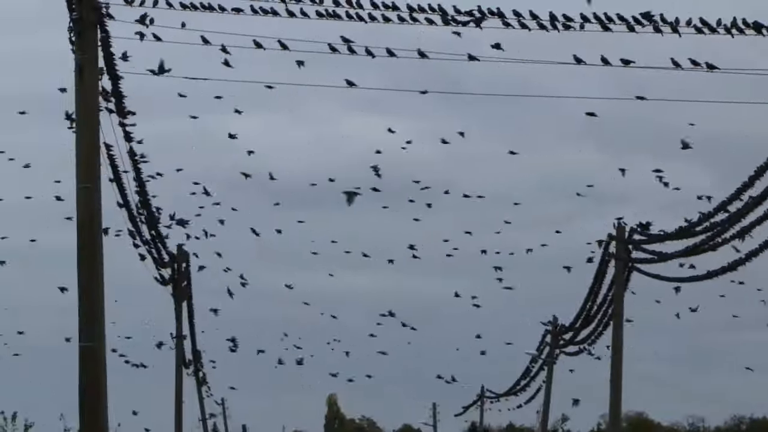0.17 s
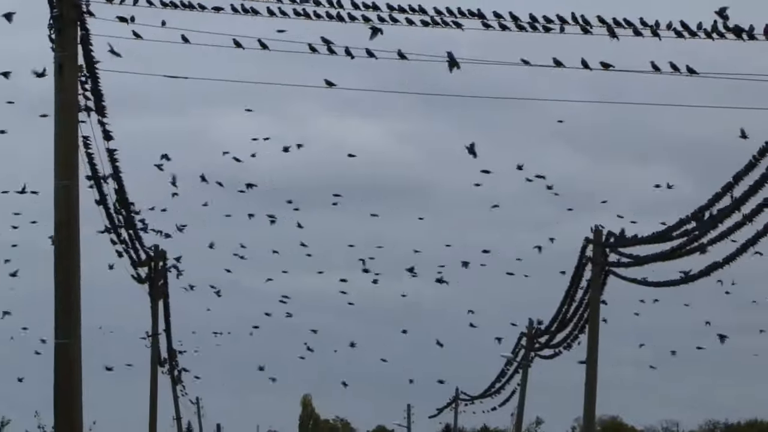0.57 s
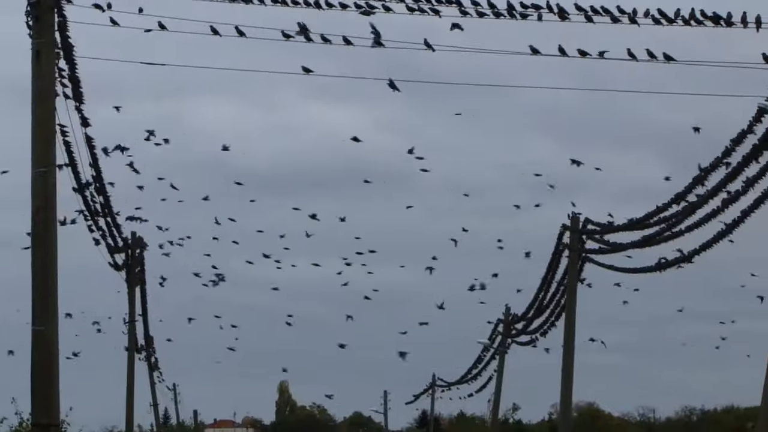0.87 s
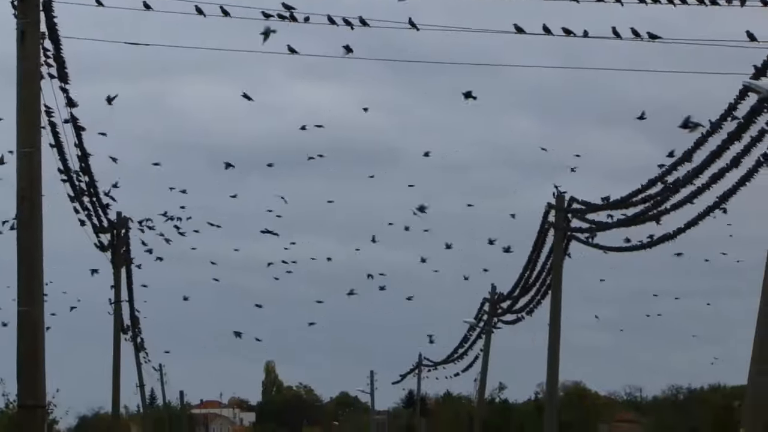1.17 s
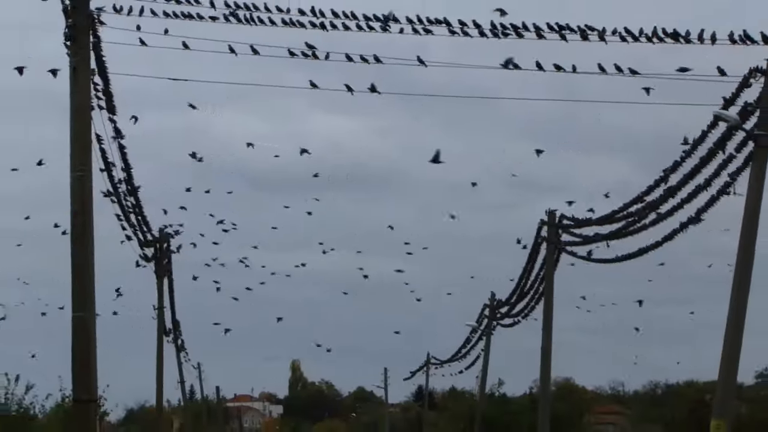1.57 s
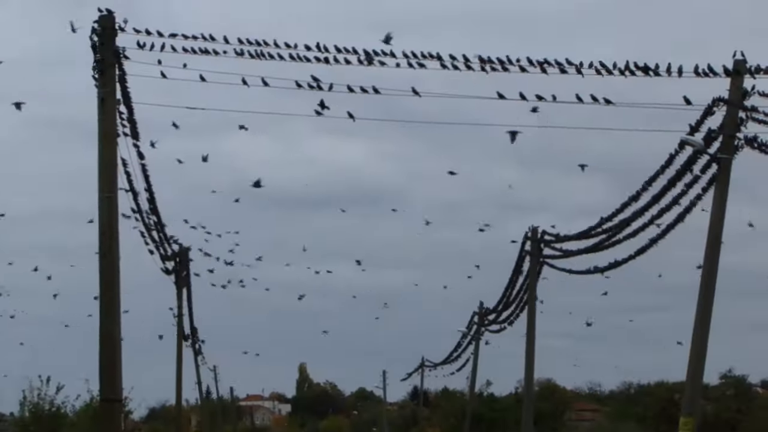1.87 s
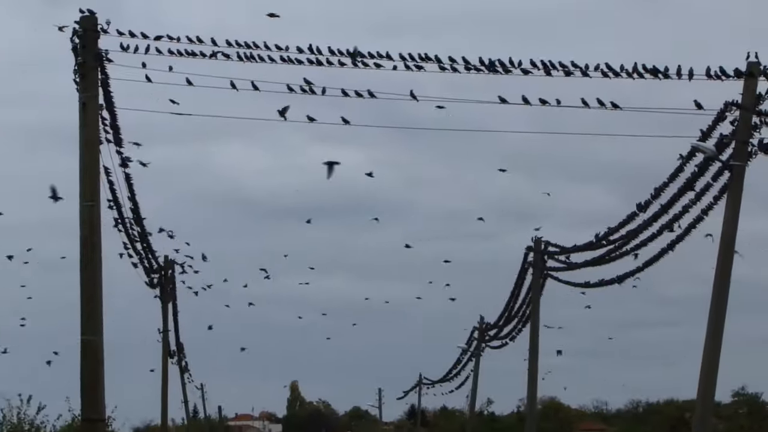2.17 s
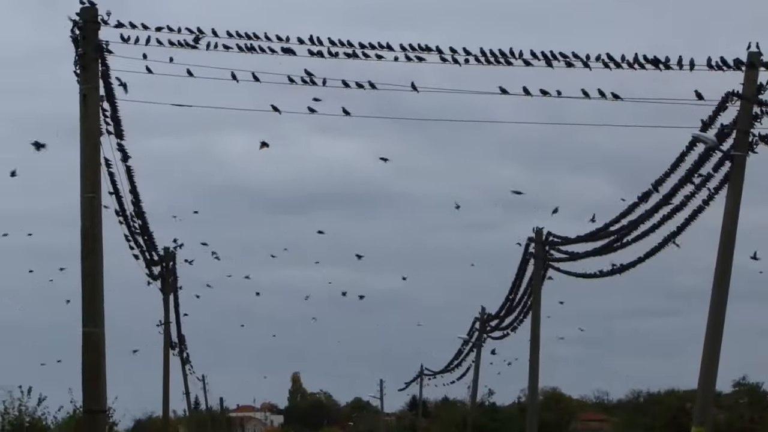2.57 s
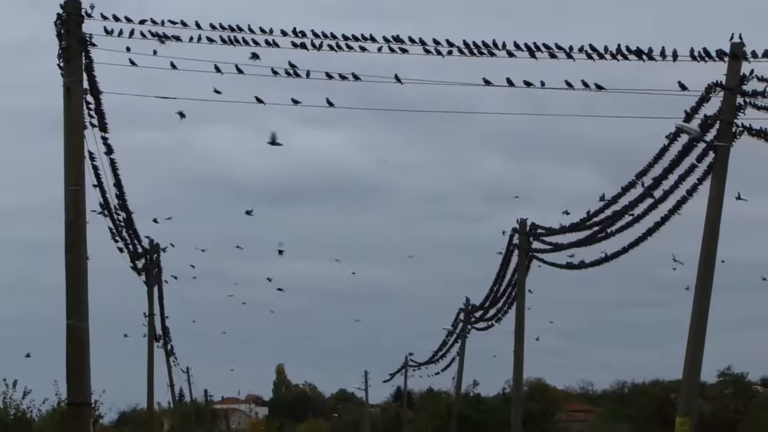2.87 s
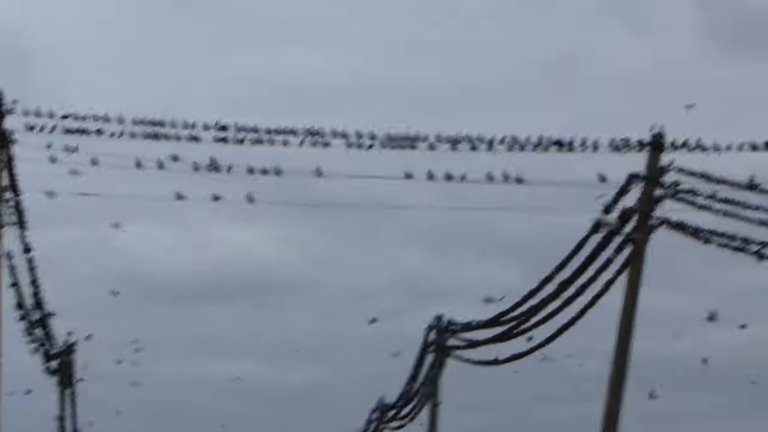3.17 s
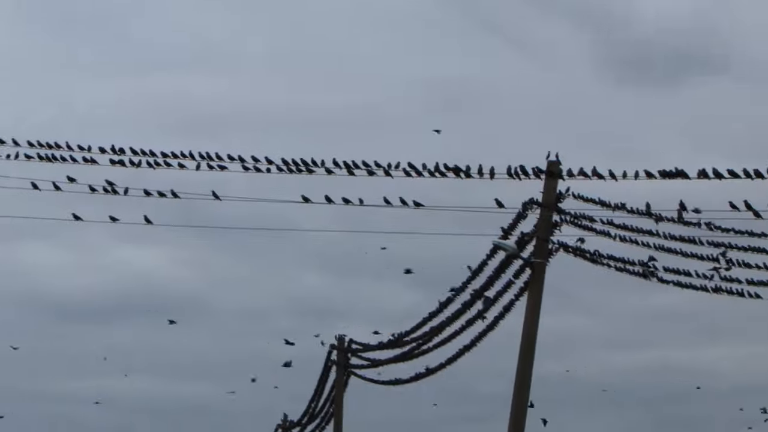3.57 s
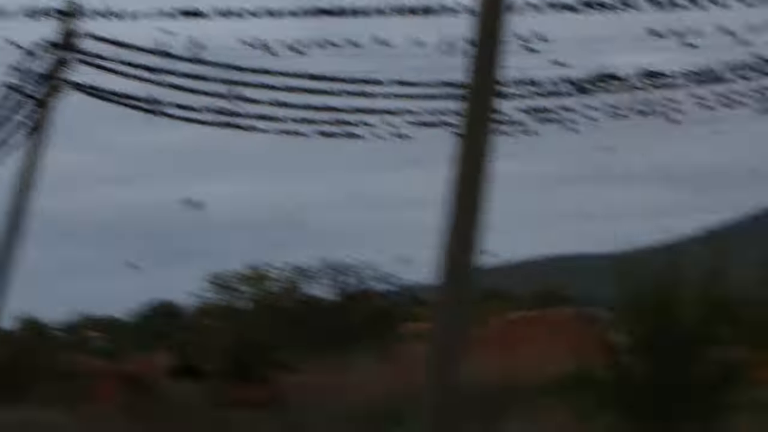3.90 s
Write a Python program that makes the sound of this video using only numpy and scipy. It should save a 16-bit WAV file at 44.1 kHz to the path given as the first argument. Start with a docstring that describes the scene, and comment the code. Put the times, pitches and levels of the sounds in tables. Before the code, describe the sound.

A huge flock of starlings chatters and whistles in a dense hiss, with low wind thumps on the microphone and handling knocks near the end.

```python
"""Thousands of starlings chatter on wires over a village: a hiss of overlapping whistles, the nearest standing out.
The flock sums short gliding tones with shaped noise; near whistles are single glides, rasps are buzzed noise bands.
Wind pops at the two ports of a hand-held camera as lumpy noise and short sagging swings, over a far hum of noise.
Fingers tap the camera's plastic body, ringing its modes, and it turns partly away from the flock."""
import sys
import numpy as np
from scipy import signal
from scipy.fft import rfft, irfft
from scipy.io import wavfile
from scipy.ndimage import uniform_filter1d

SR = 44100
rng = np.random.default_rng(int(sys.argv[2]) if len(sys.argv) > 2 else 0)


def wrap_up_sound(samples):
    """Save the sound to the file named by the first command line argument, as 16-bit audio."""
    columns = np.atleast_2d(samples).T
    # keep every value between -1 and 1, then stretch to whole-number steps
    tamed = np.clip(columns, -1, 1)
    steps = np.round(tamed * 32767).astype(np.int16)
    wavfile.write(sys.argv[1], SR, steps)


N = 177987  # samples


def gain_of(db):
    """Decibel law: an amplitude ratio grows tenfold every 20 dB."""
    return 10 ** (np.asarray(db) / 20)


def evened(x):
    """Root-mean-square normalisation: scale to unit mean power."""
    return x / np.sqrt(np.mean(x ** 2) + 1e-20)


def read(points, hz):
    """Logarithmic frequency scale: interpolate a curve evenly per octave."""
    f, value = np.transpose(points)
    return np.interp(np.log(hz + 1), np.log(f + 1), value)


def sides(db):
    """Interaural level difference: left and right gains, positive dB favouring the left."""
    return gain_of(np.array([db, -db]) / 2)


def add(mix, s, sound):
    """Superposition: sum a sound into the mix from time s, cut at its end."""
    part = mix[:, max(round(s * SR), 0):][:, :sound.shape[1]]
    part += sound[:, :part.shape[1]]


def colour(x, points):
    """Linear filtering: multiply the spectrum by a gain curve in dB."""
    spectrum = rfft(x)
    hz = np.fft.rfftfreq(x.shape[-1], 1 / SR)
    return irfft(spectrum * gain_of(read(points, hz)), x.shape[-1])


# How far the camera is turned from the wires. Each row: time in seconds, share turned away (0-1).
TURN_PATH = [(0, 0.25), (2.1, 0.23), (3.12, 0.48), (3.22, 0.56), (3.5, 0.64), (3.7, 0.48), (4.04, 0.51)]


def turned_away(s):
    """Orientation: the share by which the camera is turned from the wires at time s."""
    return np.interp(s, *np.transpose(TURN_PATH))


# Balance of the birds with the camera facing them. Each row: frequency in Hz, left-right difference in dB.
FACING_LEAN = [(700, -0.5), (1700, -0.5), (2600, -3.5), (3450, 2.5), (4500, -3), (5500, -9), (6900, -14),
               (8300, -3), (10000, -3.5)]
# Balance of the birds with the camera turned away. Each row: frequency in Hz, left-right difference in dB.
TURNED_LEAN_DB = [(900, 1.5), (1900, -2), (2600, -6), (3450, -2.5), (5000, 3), (8300, 5.5)]


def lean(hz, s):
    """Level difference between ports: depends on frequency and on how far the camera has turned."""
    away = turned_away(s)
    return read(FACING_LEAN, hz) * (1 - away) + read(TURNED_LEAN_DB, hz) * away


def lag(s):
    """Arrival-time difference: the birds' delay in seconds at the left port, longer after the swing."""
    swing_s = (2.95, 3.08)
    return np.interp(s, swing_s, [.00009, .00027])


def chorus(count, spread_db, glide, harsh_hz):
    """Incoherent summation of unrelated short calls: clean whistles up high, buzzed chirps below harsh_hz."""
    out = np.zeros(N)
    top_hz, bottom_hz, chirp_share = 11900, 900, .4
    for start, size, pitch, bend, arch, near, buzz in rng.random((count, 7)):
        harsh = pitch < chirp_share
        if harsh:
            base_hz = bottom_hz + (harsh_hz - bottom_hz) * pitch / chirp_share
            depth, shortest_s = .12, .004
        else:
            base_hz = harsh_hz + (top_hz - harsh_hz) * (pitch - chirp_share) / (1 - chirp_share)
            depth, shortest_s = glide, .0089
        hz = base_hz * (1 + depth * np.array([0, bend - arch, 2 * bend - 1.2]))
        u = np.linspace(0, 1, round(SR * shortest_s * 5 ** size))
        phase = 2 * np.pi * np.cumsum(np.interp(u, [0, .5, 1], hz)) / SR
        tone = np.sin(phase) * np.sin(np.pi * u)
        if harsh:
            # 150 to 400 pulses per second
            pulses = np.cos(np.pi * (150 + 250 * buzz) * np.arange(len(u)) / SR) ** 6
            tone = tone * evened(pulses)
        nearness_db = -spread_db * np.log(1 - .97 * near)  # a few calls stand well above the rest
        add(out[None], start * N / SR, gain_of(nearness_db) * tone[None])
    return evened(out)


# Overall strength of the flock. Each row: time in seconds, level in dB.
FLOCK_LEVEL = [(0, -28), (.11, -33.5), (.21, -30.5), (.6, -29.5), (1.05, -30.5), (1.289, -29), (1.4, -30),
               (1.73, -31), (1.85, -30), (2.2, -31), (3.0, -30.5), (3.33, -28.5), (3.5, -29.5), (4.04, -29)]
# Flock spectrum with the camera facing the wires. Each row: frequency in Hz, relative level in dB per Hz.
FACING_TONE = [(290, -9.5), (500, -28), (780, -11.5), (1110, -12.5), (1550, -12), (2000, -6), (2400, -5),
               (2850, -2.5), (3150, -9), (3500, -9.5), (4700, -7), (5400, -7), (6900, -6.5), (8100, -10),
               (10500, -35), (12000, -40.5), (13600, -84)]
# Flock spectrum with the camera turned away. Each row: frequency in Hz, relative level in dB per Hz.
TURNED_TONE = [(290, -38.5), (500, -31.5), (800, -16.5), (1500, -13), (2100, -9), (2500, -9), (2900, -8),
               (3400, -12.5), (3900, -15.5), (4500, -9.5), (5100, -15.5), (6200, -23), (8600, -33.5),
               (11000, -34), (12700, -32), (13600, -72)]
# Coherence of the flock between the ports. Each row: frequency in Hz, left-right likeness (0-1).
LIKENESS = [(500, .58), (1100, .52), (1750, .42), (2600, .36), (4500, .46), (6900, .33), (10000, .36)]


def flock():
    """Diffuse source field: calls over the blur of far birds and wings, in patches, recoloured by the turn."""
    share = 0.31  # part of the power in separate calls
    voices = np.array([chorus(count=7500, spread_db=1.5, glide=0.0543, harsh_hz=3359) for _ in range(2)])
    blur = rng.standard_normal((2, N))
    crowd = np.sqrt(share) * voices + np.sqrt(1 - share) * blur
    hz, t, (a, b) = signal.stft(crowd, SR, nperseg=512, noverlap=384)
    same = np.clip(read(LIKENESS, hz), -1, 1)[:, None]
    late = np.exp(-2j * np.pi * np.outer(hz, lag(t)))
    away = turned_away(t)
    tone_db = np.outer(read(FACING_TONE, hz), 1 - away) + np.outer(read(TURNED_TONE, hz), away)
    patches = uniform_filter1d(rng.standard_normal(a.shape), size=8, axis=0)
    patches = evened(uniform_filter1d(patches, size=9, axis=1))
    left = a * late
    right = same * a + np.sqrt(1 - same ** 2) * b
    z = np.array([left, right]) * sides(lean(hz[:, None], t))
    z *= gain_of(tone_db + 0.7 * patches)
    crowd = evened(signal.istft(z, SR, nperseg=512, noverlap=384)[1][:, :N])
    return crowd * gain_of(np.interp(np.arange(N) / SR, *np.transpose(FLOCK_LEVEL)))


def pop(hz, cycles, sag):
    """Pressure transient of one eddy: a swing that slows and broadens, with no net push, at unit peak."""
    u = np.arange(-2 * cycles, 2 * cycles, hz / SR)
    slowing = (0.12 + sag) * np.log(np.cosh(2 * u)) / 2
    turn = 2 * np.pi * (u - slowing + rng.random())
    width = cycles * (1 + sag * np.tanh(2 * u))
    bell = np.exp(-4 * np.log(2) * (u / width) ** 2)
    swing = bell * np.cos(turn)
    swing = swing - bell * swing.sum() / bell.sum()
    return swing / abs(swing).max()


# Wind between the eddies. Each row: time in seconds, level in dB before port balance and mixing.
GUST_LEVEL = [(0, -23.5), (.2, -33.5), (.3, -41), (.47, -33), (.54, -56), (.8, -45.5), (1.03, -47),
              (1.17, -26.5), (1.27, -48), (1.4, -37.5), (1.56, -52), (1.65, -34), (1.85, -33.5), (2.0, -47),
              (2.35, -41), (2.44, -48), (2.62, -55), (3.15, -55), (3.3, -58), (3.5, -65), (3.57, -38),
              (3.82, -31), (3.95, -48), (4.04, -32)]
# The hardest eddies. Each row: centre in seconds, peak in dB before filtering and port mixing,
# pitch in Hz, port (0 left, 1 right).
EDDIES = [(0.014, -8, 394, 0), (0.058, -10.5, 284, 0), (0.066, -8, 224, 0), (0.08, -11.5, 300, 1),
          (.1, -15, 237, 1), (0.143, -18, 232, 1), (0.178, -17.5, 224, 1), (0.201, -13.5, 241, 0),
          (0.278, -16, 163, 1), (0.386, -17, 222, 0), (0.413, -22, 240, 0), (0.431, -14, 380, 0),
          (0.439, -6.5, 308, 0), (0.446, -13, 300, 1), (0.471, -18.5, 221, 1), (0.59, -10, 223, 0),
          (0.677, -19.5, 173, 1), (0.72, -23, 160, 0), (0.773, -16, 287, 0), (0.838, -14.5, 194, 0),
          (0.94, -17.5, 245, 1), (0.968, -20.5, 237, 0), (1.114, -16.5, 278, 0), (1.165, -14, 298, 0),
          (1.189, -16, 225, 0), (1.223, -20.5, 232, 0), (1.285, -23, 230, 0), (1.312, -15, 275, 1),
          (1.329, -6, 410, 0), (1.43, -21, 202, 0), (1.631, -17, 250, 0), (1.693, -26, 276, 0),
          (1.7213, -4, 307, 0), (1.722, -39, 229, 1), (1.711, -24, 400, 0), (1.752, -23, 260, 0),
          (1.759, -20, 279, 0), (1.819, -14, 240, 0), (1.829, -16, 260, 0), (1.844, -17, 240, 0),
          (1.887, -10, 288, 0), (1.973, -17.5, 211, 0), (2.066, -17, 208, 0), (2.117, -15.5, 208, 0),
          (2.14, -20.5, 249, 1), (2.23, -15, 215, 0), (2.245, -23, 260, 0), (2.32, -23, 137, 0),
          (2.354, -18, 165, 0), (2.51, -30, 261, 0), (2.623, -21, 174, 0), (2.72, -30.5, 169, 0),
          (2.918, -31, 190, 1), (3.18, -25, 274, 0), (3.559, -19.5, 208, 0), (3.584, -15.5, 178, 0),
          (3.645, -12.5, 341, 0), (3.697, -19.5, 224, 0), (3.721, -17.5, 285, 1), (3.733, -16, 231, 1),
          (3.779, -11.5, 252, 0), (3.819, -17.5, 258, 1), (3.989, -16.5, 175, 0)]
# Spectrum of the turbulence. Each row: frequency in Hz, relative gain in dB.
WIND_TONE = [(15, -36), (40, -9), (80, -6.5), (150, 6.5), (260, 1.5), (420, -4.5), (700, -15), (1200, -50)]


def wind():
    """Turbulent pressure at the ports: unrelated lumpy noise and pops, each channel minus part of the other."""
    stir_db, calm_db_per_s = -18.5, 500  # churning air: level under an eddy's peak, fall to either side
    soft_cycles, snap = 1.25, 0.55  # a soft eddy's length; how much harder ones shorten
    t = np.arange(0, N + 64, 64) / SR
    churn_db = np.max([db + stir_db - calm_db_per_s * abs(t - s) for s, db, *_ in EDDIES], axis=0)
    gusts = gain_of(np.interp(t, *np.transpose(GUST_LEVEL)))
    level = np.hypot(gusts, gain_of(churn_db))
    lumps = gain_of(1.46 * np.minimum(rng.exponential(1, (2, N)), 4)) * rng.standard_normal((2, N))
    lumps *= rng.random((2, N)) < 600 / SR  # about 600 lumps per second at each port
    turbulence = evened(colour(lumps, WIND_TONE))
    ports = turbulence * np.interp(np.arange(N) / SR, t, level) * sides(1.4)[:, None]
    jolts = np.zeros((2, N))
    for s, db, hz, port in EDDIES:
        cycles = soft_cycles * (1 - snap * gain_of(db))
        eddy = gain_of(db) * pop(hz, cycles, sag=0.81 * gain_of(db))
        add(jolts[round(port)][None], s - 2 * cycles / hz, eddy[None])
    ports = ports + signal.sosfilt(signal.butter(1, 70, "high", fs=SR, output="sos"), jolts)
    return ports - .48 * ports[::-1]


# Spectrum of the far hum. Each row: frequency in Hz, relative gain in dB.
VILLAGE_TONE = [(20, -30), (60, 12), (150, 2), (400, 20.5), (700, 17), (1200, -82)]


def village():
    """Stationary background noise: a steady far hum, unrelated in the two channels."""
    hum = evened(colour(rng.standard_normal((2, N)), VILLAGE_TONE))
    return gain_of(-57.5) * hum


def whistle(length, hz, flutter, wobble_hz):
    """Frequency modulation: a near sine gliding through three pitches, level and pitch trembling; rms 1."""
    u = np.linspace(0, 1, max(round(length * SR), 8))
    waver, tremble = (evened(uniform_filter1d(z, size=70)) for z in rng.standard_normal((2, len(u))))
    glide = np.polyval(np.polyfit([0, .5, 1], hz, 2), u) + wobble_hz * tremble
    tone = np.sin(2 * np.pi * np.cumsum(glide) / SR)
    swell = np.sqrt(np.sin(np.pi * u) + 1e-9)
    return evened(tone * swell * (1 + flutter * waver))


# The nearest whistles. Each row: start in seconds, length in seconds, start, middle and end pitch in Hz,
# level in dB before left-right balance.
NEAR_WHISTLES = [(.05, .02, 6750, 6700, 6650, -43), (.119, .042, 8350, 8450, 8350, -49),
                 (.205, .06, 8300, 8290, 8200, -44), (.25, .025, 7300, 7150, 7050, -43),
                 (.315, .055, 6250, 6400, 6750, -43), (.345, .018, 4600, 4600, 4550, -42),
                 (.385, .04, 4150, 4200, 4200, -44), (.44, .022, 7100, 7050, 7000, -43),
                 (.49, .022, 4500, 4550, 4500, -42), (.528, .018, 5300, 5300, 5300, -42),
                 (.555, .048, 8350, 8550, 8350, -47), (.672, .02, 5800, 5650, 5550, -43),
                 (.705, .03, 5950, 5850, 5900, -43), (.778, .019, 9080, 9100, 9120, -51),
                 (.795, .03, 7800, 8050, 8250, -48), (.835, .035, 8830, 9000, 8660, -48),
                 (.855, .032, 4500, 4600, 4680, -43), (.87, .016, 3800, 3850, 3850, -42),
                 (.875, .03, 8480, 8860, 9030, -48), (.898, .02, 7210, 6980, 7030, -41),
                 (.91, .028, 8750, 8750, 8720, -50), (.975, .035, 8150, 8050, 7950, -47),
                 (1.052, .03, 8450, 8530, 8500, -48), (1.126, .022, 4630, 4630, 4660, -38),
                 (1.152, .022, 5970, 6100, 6030, -41), (1.178, .018, 5550, 5600, 5650, -42),
                 (1.318, .048, 3910, 3860, 3950, -41), (1.385, .06, 7550, 7600, 7750, -45),
                 (1.434, .035, 8100, 8520, 8050, -44), (1.47, .03, 7400, 7450, 7450, -45),
                 (1.5, .045, 8150, 8300, 8100, -49), (1.525, .025, 4700, 4600, 4400, -42),
                 (1.6, .035, 6650, 6750, 6950, -44), (1.66, .052, 8530, 8720, 8380, -48),
                 (1.679, .042, 7410, 7190, 6760, -43), (1.77, .02, 5550, 5450, 5400, -43),
                 (1.852, .024, 4250, 4400, 4550, -43), (1.875, .09, 8550, 8200, 8000, -44),
                 (1.962, .038, 6600, 6720, 6700, -39), (2.022, .02, 5500, 5760, 5900, -39),
                 (2.01, .022, 4850, 4950, 4950, -43), (2.035, .018, 4100, 4000, 3900, -40),
                 (2.145, .06, 6750, 7200, 7300, -40), (2.16, .08, 8000, 8300, 7800, -45),
                 (2.212, .022, 8500, 8600, 8420, -46), (2.24, .045, 6250, 6360, 6400, -42),
                 (2.275, .016, 3800, 3850, 3900, -42), (2.355, .025, 4550, 4400, 4250, -43),
                 (2.45, .04, 8500, 8850, 9050, -50), (2.489, .052, 9350, 9340, 9370, -56),
                 (2.5, .02, 3400, 3480, 3520, -40), (2.545, .05, 4850, 4950, 4950, -44),
                 (2.555, .04, 6900, 7000, 7050, -45), (2.6, .035, 7750, 7800, 7720, -43),
                 (2.617, .06, 6380, 6250, 6150, -43), (2.672, .019, 7740, 7760, 7850, -45),
                 (2.685, .02, 7400, 7300, 7250, -44), (2.785, .03, 3780, 3760, 3720, -43),
                 (2.8, .09, 8250, 8250, 8150, -50), (2.815, .03, 7000, 6750, 6500, -43),
                 (2.855, .065, 8850, 8700, 8550, -49), (2.88, .035, 4600, 4400, 4300, -43),
                 (2.934, .018, 3750, 3650, 3550, -41), (2.93, .11, 7400, 6850, 6300, -42),
                 (3.045, .028, 6500, 6600, 6700, -43), (3.08, .024, 7900, 8000, 8100, -45),
                 (3.09, .02, 5550, 5500, 5450, -42), (3.075, .04, 7600, 7400, 7100, -43),
                 (3.11, .026, 8600, 8500, 8350, -47), (3.222, .018, 4050, 4050, 4050, -42),
                 (3.26, .022, 5350, 5300, 5250, -43), (3.265, .05, 4300, 4350, 4100, -42),
                 (3.3, .055, 4750, 4650, 4600, -42), (3.352, .016, 3550, 3700, 3850, -40),
                 (3.5, .03, 4800, 4850, 4800, -44), (3.58, .044, 9170, 9120, 9300, -52),
                 (3.67, .022, 5600, 5500, 5450, -45), (3.86, .025, 7250, 7300, 7350, -49),
                 (3.93, .03, 4900, 4800, 4700, -41), (3.96, .05, 4600, 4400, 4300, -42),
                 (3.998, .036, 8900, 8560, 8670, -48)]


def near_birds():
    """Point sources: whistles above the crowd, leaning as the flock does and later at the left port."""
    out = np.zeros((2, N))
    for s, length, *hz, db in NEAR_WHISTLES:
        call = gain_of(db) * whistle(length, hz, flutter=.4, wobble_hz=50)
        left, right = sides(lean(hz[1], s))[:, None] * call
        add(out[:1], s + lag(s), left[None])
        add(out[1:], s, right[None])
    return out


# The nearest rasps. Each row: start in seconds, length in seconds, centre frequency in Hz,
# level in dB before left-right balance.
NEAR_RASPS = [(0.463, 0.095, 2800, -39), (0.593, 0.1, 2700, -38), (1.085, 0.04, 2750, -45),
              (1.264, 0.071, 2800, -34.5)]


def rasps():
    """Amplitude modulation: hoarse band noise beaten by a fast buzz, with the facing camera's balance."""
    width_hz, buzz_hz = 440, 94
    out = np.zeros((2, N))
    for s, length, hz, db in NEAR_RASPS:
        t = np.arange(0, length, 1 / SR)
        band = signal.butter(2, [hz - width_hz / 2, hz + width_hz / 2], "band", fs=SR, output="sos")
        hoarse = signal.sosfilt(band, rng.standard_normal(len(t)))
        beat = 1 + 0.29 * np.sin(2 * np.pi * (buzz_hz * t + rng.random()))
        call = evened(hoarse * beat * np.sqrt(np.sin(np.pi * t / length)))
        left, right = gain_of(db) * sides(read(FACING_LEAN, hz))[:, None] * call
        add(out[:1], s + lag(s), left[None])
        add(out[1:], s, right[None])
    return out


# Fingers on the body. Each row: start in seconds, level in dB, left-right difference in dB, contact in
# seconds, strongest frequency in Hz, fall-off in dB per octave squared, firm share (0-1), rebound in seconds.
FINGER_TAPS = [(0.775, -31, -2, 0.0028, 1250, 20, 0.2, 0.00074),
               (.881, -33, -4, 0.0062, 900, 5, .2, 0.0011), (0.924, -31.5, -4, 0.0048, 1200, 8, .2, .0008),
               (1.39, -34, -5, 0.0021, 1000, 14, .3, 0.0011), (1.4665, -32, 4, 0.009, 1200, 10, .25, .004),
               (3.33, -33, -6, 0.045, 3000, 0.5, 0, .001), (3.332, -37, 3, 0.035, 1100, 1, 0.04, 0.00092),
               (3.5735, -20.5, 1, 0.003, 1800, 1.5, 0.7, 0.00085),
               (3.754, -31, 1, 0.0025, 2300, 20, .3, 0.00093),
               (3.7942, -13, 2.5, 0.005, 1600, 1.6, 0.67, .0016),
               (3.806, -24.5, 7, 0.008, 2500, 2, 0.03, 0.0018)]
# Modes of the plastic body. Each row: frequency in Hz, relative level in dB, 60 dB decay time in seconds,
# left-right difference in dB, phase between the ports in cycles.
BODY_MODES = [(448, -9, 0.018, -22, 0.2), (575, -2.5, 0.026, 11, 0.11), (917, -0.5, 0.021, 6, 0.12),
              (1227, 1.5, 0.021, 10, 0.091), (1614, 2, 0.02, -2, 0.44), (2070, -1.5, 0.016, -3, 0.35),
              (2350, -5, .016, 3, .2), (2730, -1.5, 0.019, 6, 0.17), (3430, -0.5, 0.013, -9, 0.25),
              (4300, -1, 0.009, 0, 0.21), (4700, 0.5, 0.01, -6, 0.27), (6300, 1, 0.0097, -4, 0.39),
              (8800, 7, 0.0034, -4, 0.34), (9900, -6.5, 0.0042, -2, 0.18), (11100, -5, 0.0048, -7, 0.29)]


def handling():
    """Modal excitation: a firm blow with one rebound and a dying rattle ring the body modes at both ports."""
    rise_cycles, rebound_height = 0.64, 0.82  # a mode's build-up; rebound against the blow
    out, t = np.zeros((2, N)), np.arange(1500) / SR
    hz, mode_db, t60, mode_lean_db, turn = np.transpose(BODY_MODES)[:, :, None]
    envelope = np.minimum(t * hz / rise_cycles, 1) * gain_of(-60 * t / t60)
    ring = envelope * np.sin(2 * np.pi * (hz * t + np.array([0 * turn, turn])))
    for s, db, lean_db, contact, centre_hz, fall_db, firm, rebound in FINGER_TAPS:
        u = np.linspace(0, 1, round(contact * SR) + 2)
        rattle = rng.standard_normal((1, len(hz), len(u))) * np.minimum(u * contact / 0.00035, 1)
        rattle *= (1 - u) ** np.clip(hz * 0.0045 / contact / 1500, 1, 4)  # later: softer and duller
        loose = signal.fftconvolve(ring, rattle, axes=2)
        loose *= np.linalg.norm(ring, axis=2, keepdims=True) / np.linalg.norm(loose, axis=2, keepdims=True)
        blows = np.zeros((1, 1, len(u)))
        blows[..., [0, min(round(rebound * SR), len(u) - 1)]] = 1, rebound_height
        struck = signal.fftconvolve(ring, blows, axes=2)
        modes = np.sqrt(1 - firm) * loose + np.sqrt(firm / 2) * struck
        tilt_db = mode_db - fall_db * np.log2(hz / centre_hz) ** 2
        blow = (modes * sides(lean_db + mode_lean_db) * gain_of(tilt_db)).sum(1)
        power = uniform_filter1d((blow ** 2).mean(0), size=100).max()  # level is set at the loudest moment
        add(out, s, gain_of(db) * blow / np.sqrt(power))
    return out


def scene():
    """Superposition of birds, wind, hum and hands."""
    return flock() + wind() + village() + near_birds() + rasps() + handling()


def record(dry):
    """Band limiting: the microphone's bass cut, then a steep treble limit."""
    edge_hz = 13500
    cut = signal.sosfilt(signal.butter(2, 75, "high", fs=SR, output="sos"), dry)
    limit = signal.firwin(511, edge_hz, window=("kaiser", 9), fs=SR)
    return signal.oaconvolve(cut, limit[None], "same")


dry = scene()
out = record(dry)
wrap_up_sound(out)
```